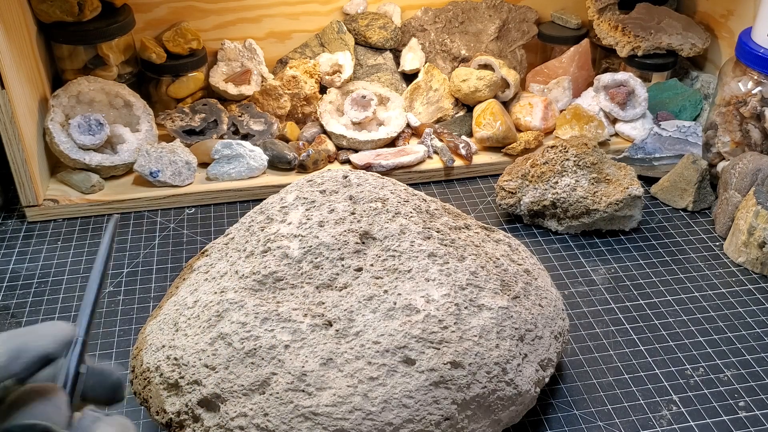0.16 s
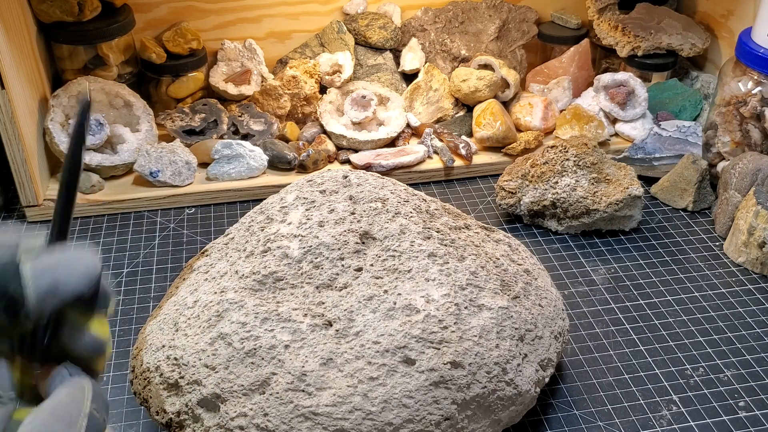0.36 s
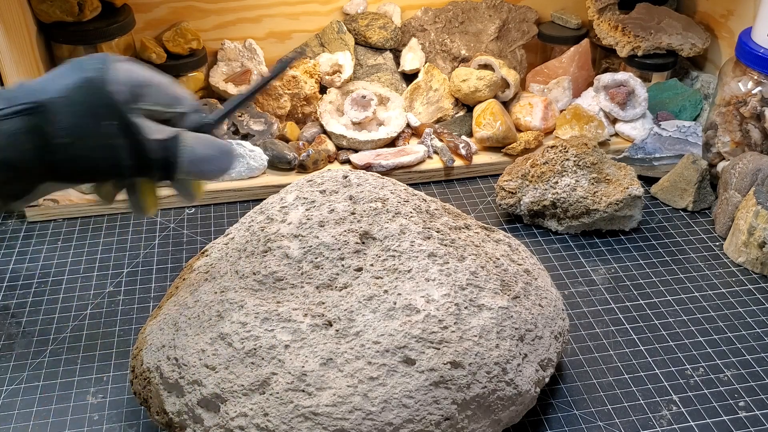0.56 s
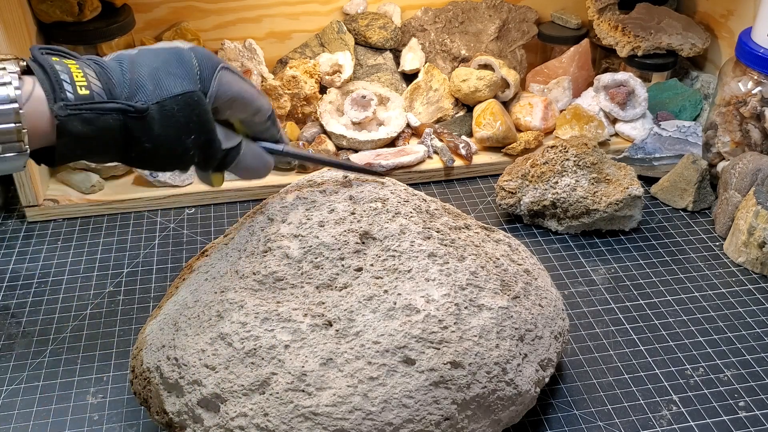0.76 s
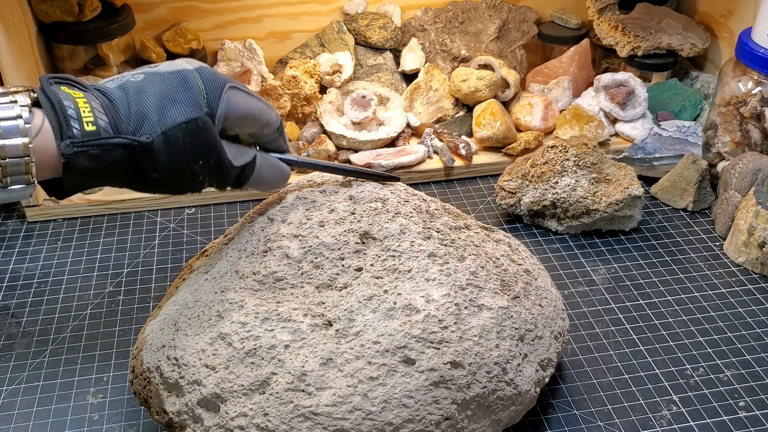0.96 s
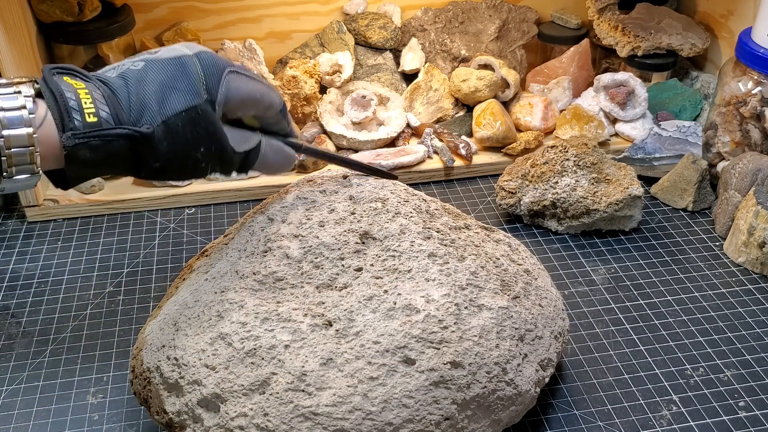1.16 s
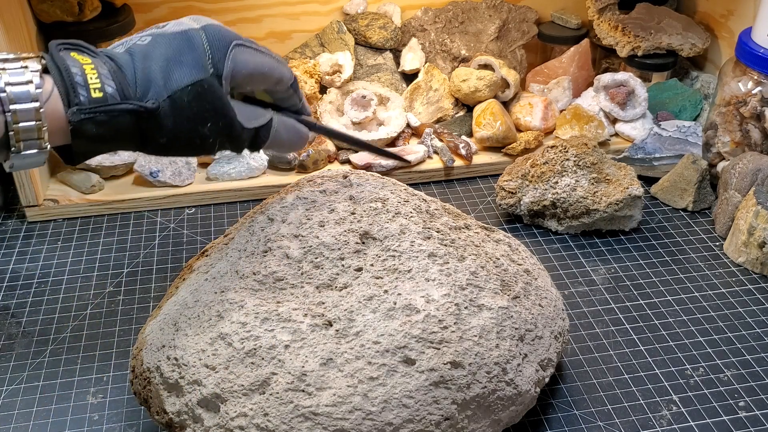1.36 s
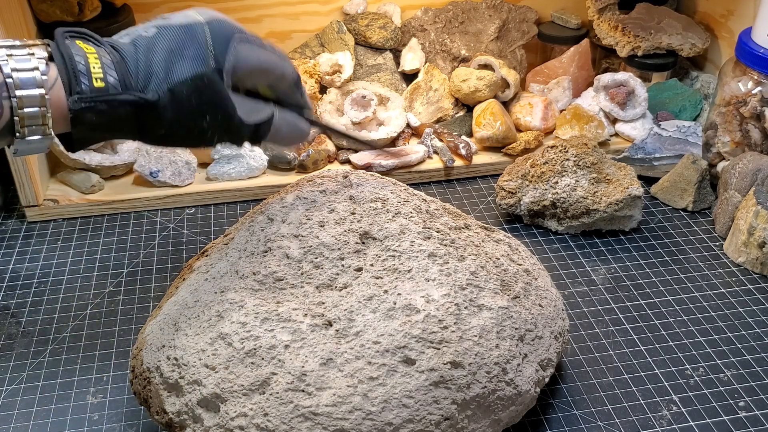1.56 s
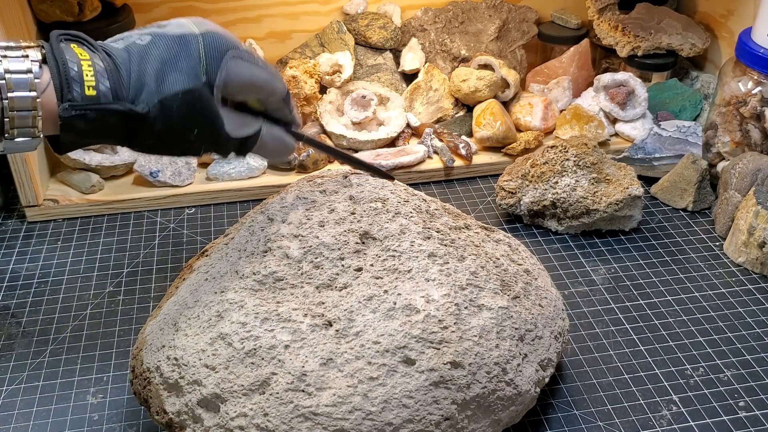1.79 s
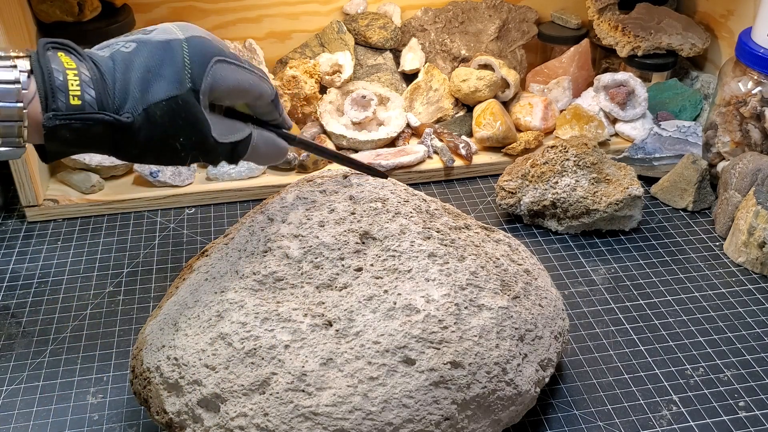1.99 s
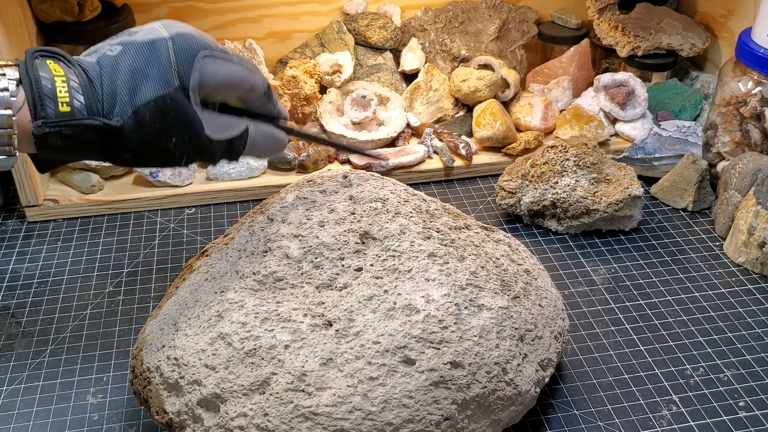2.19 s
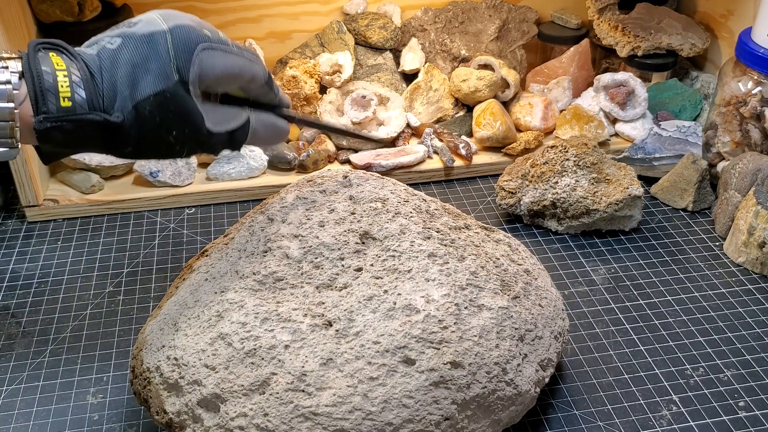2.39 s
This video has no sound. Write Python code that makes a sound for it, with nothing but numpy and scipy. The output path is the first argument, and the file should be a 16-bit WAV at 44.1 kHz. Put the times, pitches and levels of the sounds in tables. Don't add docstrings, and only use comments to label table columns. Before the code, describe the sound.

A thin steel tool taps a large porous rock on a workbench. One loud clink opens, faint glove rustle and small bumps follow, then nine quieter, uneven taps. Close small microphone, low workshop rumble.

```python
import sys
import numpy as np
from scipy import signal
from scipy.io import wavfile
from scipy.ndimage import uniform_filter1d

SR = 44100
rng = np.random.default_rng(int(sys.argv[2]) if len(sys.argv) > 2 else 0)


def transcribe(u):
    v = np.clip(np.atleast_2d(u).T, -1, 1)
    q = np.round(v * 32767).astype(np.int16)
    wavfile.write(sys.argv[1], SR, q)


def convert_level_to_amplitude(level_db):
    exponent = np.asarray(level_db, float) / 20
    return 10 ** exponent


N = 107383

# freq_hz, density_db_per_hz
RUMBLE_SPECTRUM = [(30, -16.5), (53, 6), (70, -3.5), (86, -4), (125, -18), (250, -16), (420, -30),
                   (1480, -42)]
HISS_SPECTRUM = [(1500, 7.5), (2000, -3.5), (2700, -6.5), (8000, -11), (14500, -11), (15900, -18)]
# time_s, level_db
RUMBLE_COURSE = [(0.0, -41), (0.3, -46), (0.74, -45), (1.24, -45), (1.41, -50.5), (1.6, -48), (2.28, -48),
                 (2.43, -45.5)]
# time_s, level_db
SLEEVE_STIR = [(0.0, -76), (0.34, -79), (0.5, -76), (1.52, -81), (1.88, -80.5), (2.17, -78.5),
               (2.43, -80.5)]

# start_s, deep_db, main_db, upper_db, knock_db
ROCK_TAPS = [
    (-.003, -42.5, -24, -47.5, -42.5),
    (0.826, -71, -56.5, -104, -70),
    (1.017, -46, -40, -55, -49.5),
    (1.229, -43, -36.5, -40, -45),
    (1.563, -46.5, -48, -52.5, -55.5),
    (1.745, -61, -56, -68, -58),
    (1.882, -60, -54, -57.5, -63),
    (2.056, -49.5, -50, -47.5, -56.5),
    (2.214, -49.5, -45, -42, -51),
    (2.359, -57, -50.5, -54.5, -56),
]
# start_s, side_db, halo_db, thump_db, crack_db
ROCK_FLANKS = [
    (-.003, -59, -27.5, -41, -62.5),
    (1.0166, -64, -58, -48.5, -53),
    (1.2271, -50, -43, -45.5, -38.5),
    (1.561, -63.5, -57, -62, -60),
    (1.743, -74.5, -57.5, -52, -56),
    (1.883, -65, -54, -50, -54),
    (2.054, -51.5, -52, -64, -50),
    (2.2144, -49, -44, -59, -55.5),
    (2.356, -60, -52, -77, -70),
]
# start_s, fine_db, shaft_db, middle_db, top_db
TOOL_CLINKS = [
    (-.003, -48.5, -37.5, -34, -25),
    (0.826, -81.5, -88, -67, -80),
    (1.017, -57, -61, -48, -52),
    (1.228, -43, -72, -37.5, -43.5),
    (1.561, -62.5, -82, -49, -52),
    (1.743, -72, -81, -46.5, -52),
    (1.882, -69, -64, -50, -52),
    (2.057, -58, -62, -49.5, -59),
    (2.214, -44.5, -71, -45.5, -67),
    (2.358, -56.5, -56.5, -50, -48.5),
]
# start_s, level_db, centre_hz, width_hz, bright_db
GRIT_BURSTS = [(-.003, -44, 5320, 3280, -34.5), (0.823, -71.5, 5300, 1500, -63),
               (1.015, -56.5, 4800, 2060, -57.5), (1.228, -47, 4130, 1930, -45.5),
               (1.56, -62, 4390, 2430, -54), (1.705, -84, 6740, 2520, -78),
               (1.742, -61.5, 4850, 2280, -50.5), (1.88, -55, 5820, 1700, -51),
               (1.983, -84.5, 6150, 870, -89), (2.054, -58, 3950, 2700, -54),
               (2.214, -45.5, 4090, 1870, -47.5), (2.358, -57, 4400, 2690, -48)]
# start_s, level_db
BENCH_THUDS = [
    (.0, -32.5),
    (1.02, -47),
    (1.23, -33.5),
    (2.219, -46),
]
# start_s, level_db, pitch_hz, t60_s
SINGLE_MODES = [(.0, -44, 3157, .09), (.0, -42, 560, .05), (.008, -48, 4650, .04), (.075, -65, 2196, 0.28),
                (.637, -43.5, 278, 0.15), (.637, -47.5, 489, 0.075), (.648, -49, 374, 0.12),
                (.655, -52, 520, 0.074), (.826, -58, 1456, .03), (1.707, -68, 9911, 0.14),
                (1.984, -65, 6050, .04), (2.36, -56, 817, .06), (2.057, -58, 980, .05),
                (1.563, -57, 1050, .04), (.704, -48.5, 512, 0.067), (.705, -51.5, 753, 0.088),
                (.7045, -51, 1200, 0.022), (1.017, -49, 880, .05), (1.229, -44, 748, 0.074),
                (1.229, -55, 905, .05), (1.563, -49.5, 746, 0.085), (1.563, -53.5, 872, 0.055),
                (1.744, -49.5, 880, 0.068), (1.745, -54.5, 722, 0.098), (1.882, -49, 4920, 0.1),
                (1.883, -54, 5502, 0.12), (1.883, -64, 6137, .08), (2.057, -52, 785, 0.065),
                (2.215, -51, 755, .09), (2.215, -55, 900, 0.055)]
# start_s, level_db, centre_hz, width_hz,
# length_s
HANDLING_NOISES = [(.004, -46, 192, 120, 0.016), (0.0523, -38.5, 7800, 600, 0.002),
                   (.312, -56.5, 6700, 1500, 0.003), (.313, -70.5, 4000, 2000, 0.0054),
                   (0.363, -47, 10700, 3900, 0.0011), (0.614, -68, 6470, 3100, 0.0028),
                   (0.705, -58.5, 1800, 4040, 0.00041), (0.825, -64, 5960, 6000, .001),
                   (1.7047, -64, 9800, 2520, 0.0061), (1.939, -78.5, 5700, 500, .002),
                   (1.984, -74, 7840, 900, 0.0036),
                   (0.313, -68, 11000, 3240, 0.013), (0.315, -65, 1050, 854, 0.038),
                (0.331, -50, 9630, 500, 0.0043), (0.338, -48.5, 9520, 400, 0.003),
                (0.341, -67, 9330, 400, .016), (0.33, -60, 5460, 2500, 0.0045),
                (.331, -68, 12400, 2500, 0.0049), (0.337, -75, 11400, 4000, .025),
                (0.365, -61, 9650, 2980, 0.0049), (.372, -85, 10100, 3500, 0.031),
                (0.382, -78.5, 4400, 2500, 0.045), (0.44, -67, 9500, 1000, 0.005),
                (0.448, -70.5, 6540, 1190, 0.054), (0.472, -60.5, 6670, 900, .002),
                (0.458, -74, 4570, 1300, 0.043), (0.463, -70.5, 9400, 1800, 0.03),
                (0.6, -77.5, 4840, 4770, 0.17), (0.733, -81.5, 10000, 4000, 0.038)]

ROCK_UPPER_HZ = [2196]
ROCK_SIDE_HZ = [2031, 2415, 2632]
ROCK_FINE_HZ = [2885, 3159, 3340, 3601, 3790, 3847, 4113, 4441, 4620, 4721, 5012, 5502]
STEEL_SHAFT_HZ = [5660, 7458]
ROCK_CRUST_HZ = [2632, 3340, 3709, 3847, 4441, 4662, 4737, 5012, 5362, 5502, 6067, 6298, 8118, 8360]
# relative_db, t60_s, swell_s
ROCK_DEEP = [(0.0057, 0.36, 0.0071)]
ROCK_MAIN = [(0.0095, 0.277, 0.0013)]
ROCK_UPPER = [(10.25, 0.23, 0.02)]
ROCK_SIDE = [(-0.85, 0.27, .003), (-0.94, 0.27, 0.0037), (-1, 0.2, 0.0073)]
ROCK_FINE = [(-13.5, .2, 0.014), (-2, 0.18, 0.015), (-3, 0.16, 0.0069), (-8.5, 0.149, 0.0063),
             (-3.5, 0.14, .005), (0, 0.19, 0.0028), (-10.5, 0.12, .004), (-2, 0.14, 0.0023),
             (-1.5, .1, .005), (-8, 0.083, 0.0077), (-22, 0.06, 0.012), (-6, 0.072, 0.008)]
STEEL_SHAFT = [(0, 0.085, 0.004), (0, 0.18, 0.0032)]
STEEL_MIDDLE = [(0, .125, .004)]
STEEL_TOP = [(0, .115, .004)]
# split_hz, share_0_1
DEEP_TWIN = (4.3, 0.24)
MAIN_TWIN = (-14.5, 0.37)
RING_TWIN = (3.3, 0.16)
STEEL_TWIN = (100, 0.31)
TOP_TWIN = (45, .35)

ROCK_WOBBLE, STEEL_WOBBLE = 0.24, 0.45


def evened(x):
    return x / np.sqrt(np.mean(x ** 2) + 1e-20)


def smoothed_twice(x, size, axis=-1):
    return uniform_filter1d(uniform_filter1d(x, size, axis=axis), size, axis=axis)


def clock(samples):
    return np.arange(samples) / SR


def flutter(share, shape, size):
    return 1 + share * evened(smoothed_twice(rng.standard_normal(shape), size))


def add(mix, start_s, sound):
    at = round(start_s * SR)
    sound = sound[max(-at, 0):]
    part = mix[max(at, 0):][:len(sound)]
    part += sound[:len(part)]


def band(x, centre_hz, width_hz):
    b, a = signal.iirpeak(min(centre_hz, 0.45 * SR), max(centre_hz / width_hz, 0.3), SR)
    once = signal.lfilter(b, a, x)
    return evened(signal.lfilter(b, a, once))


def grains(size):
    strength_db = 2 * np.minimum(rng.exponential(1, size), 5)
    return rng.standard_normal(size) * convert_level_to_amplitude(strength_db)


def ring(level_db, modes_hz, modes, twin, wobble, t):
    hz = np.reshape(modes_hz, (-1, 1))
    rel_db, t60_s, swell_s = np.transpose(modes)[:, :, None]
    split_hz, share = twin
    luck = rng.standard_normal((len(modes), 2))
    turn, phase = 2 * np.pi * t, np.pi * luck[:, 1:]
    tone = np.sin(hz * turn + phase) + share * np.sin((hz + split_hz) * turn + phase)
    scatter_db = 1 * luck[:, :1] * (rel_db != rel_db.max())
    tone = tone * flutter(wobble, tone.shape, size=160)
    decay = convert_level_to_amplitude(level_db + rel_db + scatter_db - 60 * t / t60_s)
    return (decay * (1 - np.exp(-t / swell_s)) * tone).sum(0)


def gate(t, depth_db):
    close_s, soft_s = 0.095, 0.007
    return convert_level_to_amplitude(depth_db / (1 + np.exp(-(t - close_s) / soft_s)))


def room(x):
    t60_s, level_db = 0.19, -7
    echoes = np.zeros(8000)
    at = np.arange(80, 7980, 20) + rng.integers(0, 20, 395)
    echoes[at] = rng.choice([-1., 1.], len(at)) * convert_level_to_amplitude(-60 * at / SR / t60_s)
    echoes /= np.linalg.norm(echoes)
    return x + convert_level_to_amplitude(level_db) * signal.fftconvolve(x, echoes)[:len(x)]


def air(spectrum, level_db, patchy_db):
    frames, hz = N // 512 + 6, np.fft.rfftfreq(2048, 1 / SR)
    real, imag, patches = rng.standard_normal((frames, 1025, 3)).T
    patches = smoothed_twice(patches, 6, axis=0)
    patches = evened(uniform_filter1d(patches, 1, axis=1))
    f, density_db = np.transpose(spectrum)
    shape_db = np.interp(np.log(hz + 1), np.log(f + 1), density_db, left=-90, right=-90)
    bins = (real + 1j * imag) * convert_level_to_amplitude(shape_db[:, None] + patchy_db * patches)
    noise = signal.istft(bins, nperseg=2048, noverlap=1536)[1][:N]
    return convert_level_to_amplitude(level_db) * evened(noise)


def course(points):
    time_s, level_db = np.transpose(points)
    return convert_level_to_amplitude(np.interp(clock(N), time_s, level_db - level_db.mean()))


def tap(start_s, deep_db, main_db, upper_db, knock_db):
    t = clock(11000)
    knock_hz, width_hz, t60_s, push_t60_s, rise_s = 768, 620, 0.2, 0.039, 0.0019
    knock = band(rng.standard_normal(len(t)), knock_hz, width_hz) * flutter(0.064, len(t), size=99)
    push = sum(np.sin(2 * np.pi * knock_hz * k * t) for k in (0.82, 1.02, 1.2))
    push = push * convert_level_to_amplitude(-60 * t / push_t60_s)
    knock = (knock * convert_level_to_amplitude(-60 * t / t60_s) + 0.09 * push) * convert_level_to_amplitude(knock_db) * np.minimum(t / rise_s, 1)
    deep = ring(deep_db, 1315, ROCK_DEEP, DEEP_TWIN, ROCK_WOBBLE, t)
    main = ring(main_db, 1456, ROCK_MAIN, MAIN_TWIN, ROCK_WOBBLE, t)
    upper = ring(upper_db, ROCK_UPPER_HZ, ROCK_UPPER, RING_TWIN, ROCK_WOBBLE, t)
    return start_s, knock + deep + main + upper


def flank(start_s, side_db, halo_db, thump_db, crack_db):
    t = clock(11000)

    def burst(level_db, centre_hz, width_hz, t60_s, rise_s):
        noise = band(grains(len(t)), centre_hz, width_hz)
        return noise * convert_level_to_amplitude(level_db - 60 * t / t60_s) * np.minimum(t / rise_s, 1)

    halo = burst(halo_db, 1370, 450, 0.049, 0.001)
    thump = burst(thump_db, 330, 220, 0.18, 0.004)
    crack = burst(crack_db, 8000, 9000, 0.012, 0.0003)
    side = ring(side_db, ROCK_SIDE_HZ, ROCK_SIDE, RING_TWIN, ROCK_WOBBLE, t)
    return start_s, halo + thump + crack + side


def clink(start_s, fine_db, shaft_db, middle_db, top_db):
    t = clock(11000)
    shaft = ring(shaft_db, STEEL_SHAFT_HZ, STEEL_SHAFT, STEEL_TWIN, STEEL_WOBBLE, t)
    middle = ring(middle_db, 9911, STEEL_MIDDLE, STEEL_TWIN, STEEL_WOBBLE, t)
    top = ring(top_db, 13628, STEEL_TOP, TOP_TWIN, 0.33, t)
    fine = ring(fine_db, ROCK_FINE_HZ, ROCK_FINE, RING_TWIN, 0.25, t)
    return start_s, shaft + middle + top + fine


def grit(start_s, level_db, centre_hz, width_hz, bright_db):
    t = clock(11000)
    hold_s, t60_s, pores_t60_s, pores_db = 0.011, 0.15, 0.098, 1
    bright_hold_s, bright_t60_s, rise_s = 0.006, 0.085, 0.002
    after = np.maximum(t - hold_s, 0)
    body = band(grains(len(t)), centre_hz, width_hz) * convert_level_to_amplitude(-60 * after / t60_s)
    size, life, phase = rng.uniform(-1.6, 1, (len(ROCK_CRUST_HZ), 3)).T[:, :, None]
    crust_hz = np.reshape(ROCK_CRUST_HZ, (-1, 1))
    near = convert_level_to_amplitude(2.1 * size) / (1 + ((crust_hz - centre_hz) / (0.58 * width_hz)) ** 2)
    pores = np.sin(2 * np.pi * crust_hz * t + np.pi * phase)
    pores = pores * convert_level_to_amplitude(-60 * after / (pores_t60_s * (1 + 0.29 * life)))
    pores = (near * pores * flutter(0.45, pores.shape, size=120)).sum(0) / np.linalg.norm(near)
    bright_fade = convert_level_to_amplitude(bright_db - 60 * np.maximum(t - bright_hold_s, 0) / bright_t60_s)
    bright = band(grains(len(t)), 9600, 3600) * bright_fade
    crumble = convert_level_to_amplitude(level_db) * (body + convert_level_to_amplitude(pores_db) * pores) + bright
    return start_s, crumble * np.minimum(t / rise_s, 1)


def thud(start_s, level_db):
    t = clock(15000)
    pitch_hz, t60_s, swell_s = 84.6, 0.25, 0.0063
    envelope = convert_level_to_amplitude(level_db - 60 * t / t60_s) * (1 - np.exp(-t / swell_s))
    return start_s, envelope * np.sin(2 * np.pi * pitch_hz * t)


def ping(start_s, level_db, pitch_hz, t60_s):
    t = clock(8000)
    swell_s = 0.0028
    envelope = convert_level_to_amplitude(level_db - 60 * t / t60_s) * (1 - np.exp(-t / swell_s))
    return start_s, envelope * np.sin(2 * np.pi * pitch_hz * t) * flutter(0.14, len(t), size=120)


def rustle(start_s, level_db, centre_hz, width_hz, length_s):
    t = clock(9000)
    t60_s = min(0.0097, 6 * length_s)
    rise_s = length_s * min(9 * length_s, 0.5) + 1e-4
    fade = convert_level_to_amplitude(level_db - 60 * np.maximum(t - length_s, 0) / t60_s)
    return start_s, band(grains(len(t)), centre_hz, width_hz) * fade * np.minimum(t / rise_s, 1)


def scene():
    rumble = air(RUMBLE_SPECTRUM, -44, patchy_db=0.84) * course(RUMBLE_COURSE)
    hiss = air(HISS_SPECTRUM, -80.5, patchy_db=1.3) * course(SLEEVE_STIR)
    mix = rumble + hiss
    # source, events, room answer, suppression depth_db
    gated = ((tap, ROCK_TAPS, False, -14), (flank, ROCK_FLANKS, False, -14),
             (clink, TOOL_CLINKS, False, -3), (grit, GRIT_BURSTS, True, -3),
             (rustle, HANDLING_NOISES, True, -3))
    for source, events, in_room, depth_db in gated:
        for event in events:
            start_s, sound = source(*event)
            if in_room:
                sound = room(sound)
            add(mix, start_s, sound * gate(clock(len(sound)), depth_db))
    for event in BENCH_THUDS:
        add(mix, *thud(*event))
    for event in SINGLE_MODES:
        add(mix, *ping(*event))
    return mix[None]


def low_pass(x):
    return signal.sosfilt(signal.butter(12, 15900, fs=SR, output="sos"), x)


def record(dry):
    low_cut = signal.butter(3, 38, "high", fs=SR, output="sos")
    top_cut = signal.butter(6, 15250, fs=SR, output="sos")
    mix = signal.sosfilt(np.vstack([low_cut, top_cut]), dry)
    return low_pass(mix)


dry = scene()
out = record(dry)
transcribe(out)
```